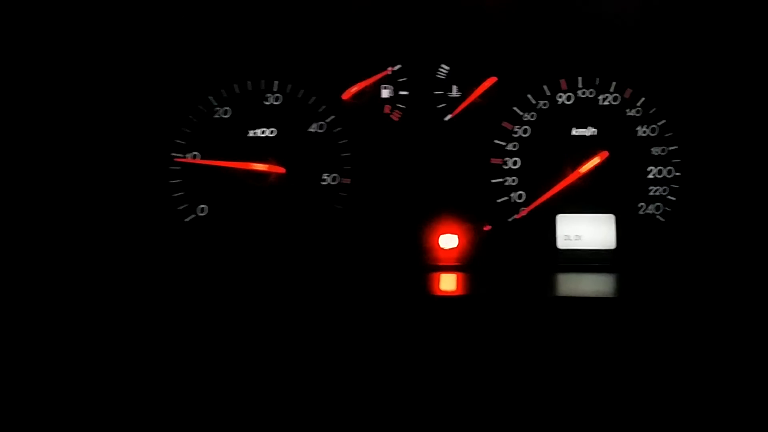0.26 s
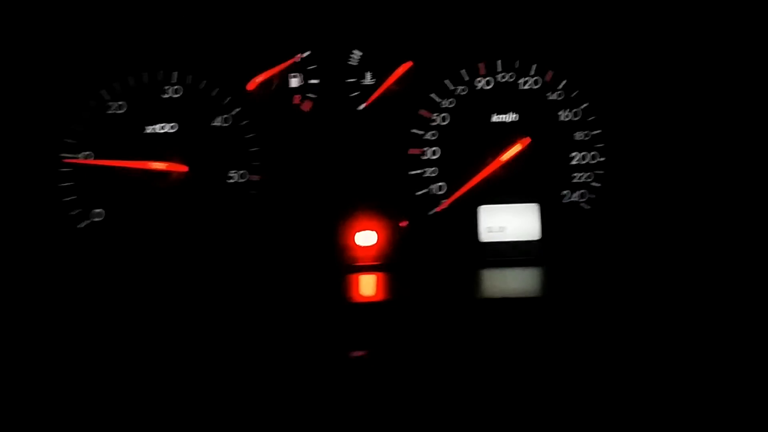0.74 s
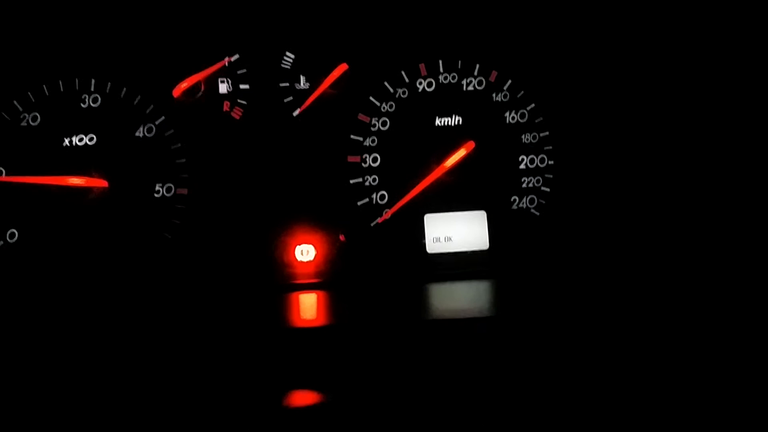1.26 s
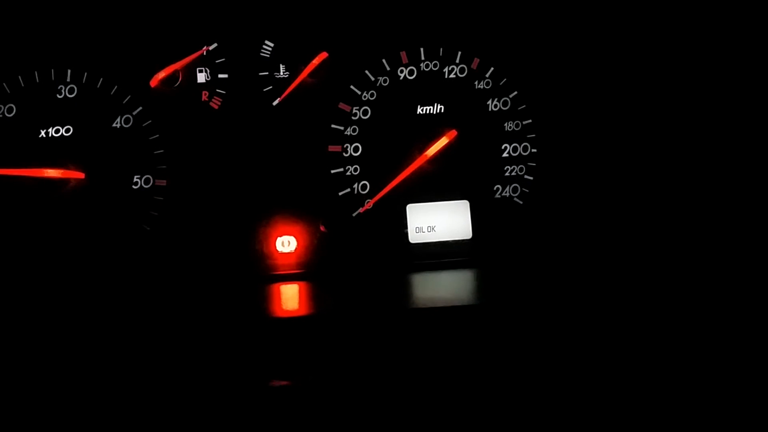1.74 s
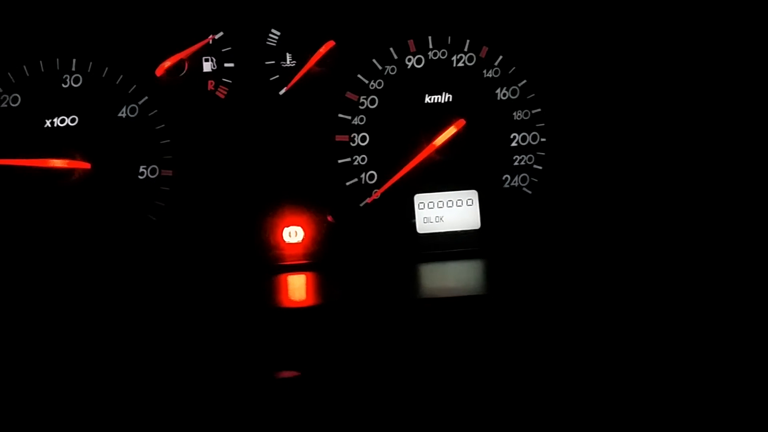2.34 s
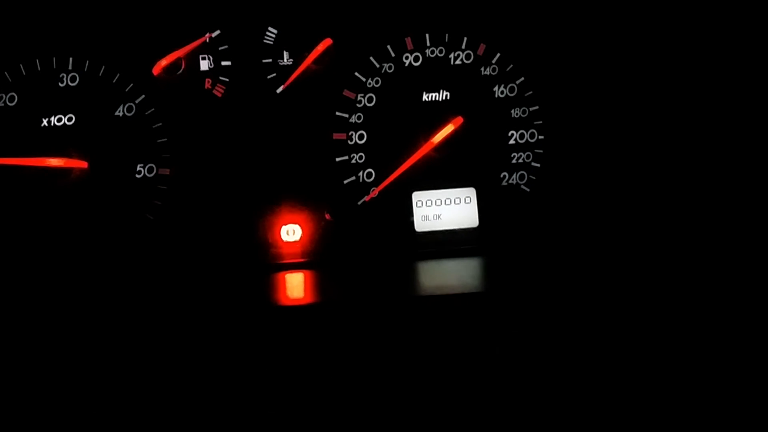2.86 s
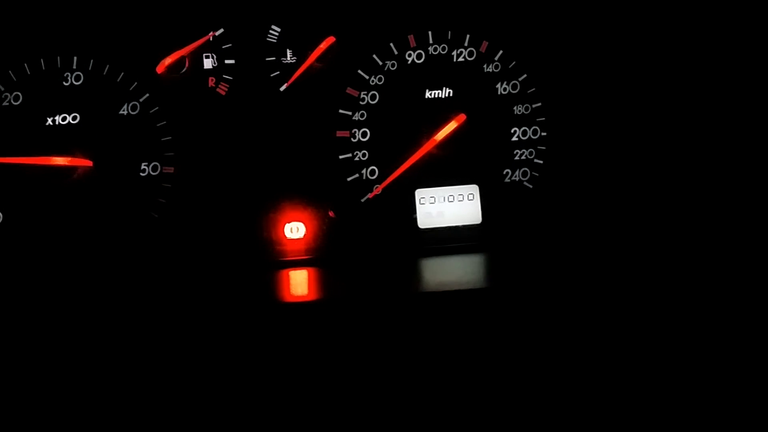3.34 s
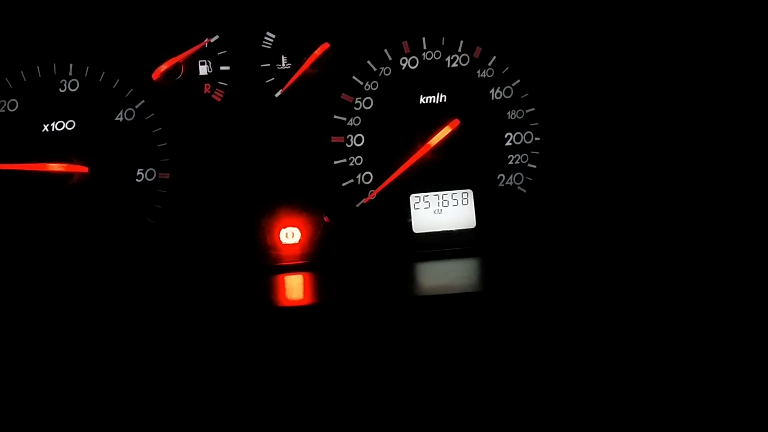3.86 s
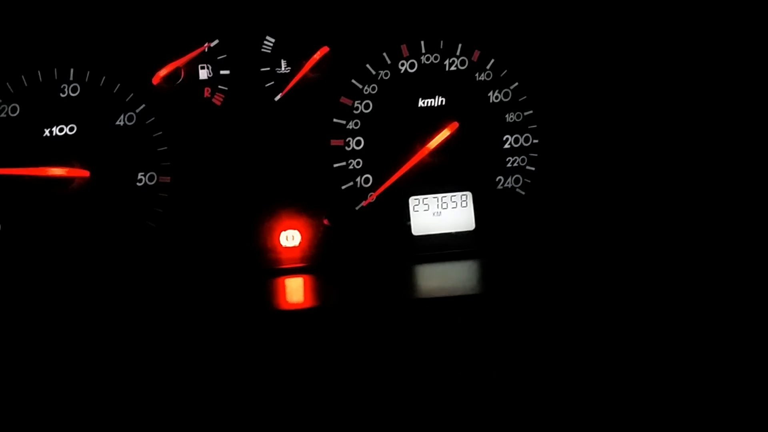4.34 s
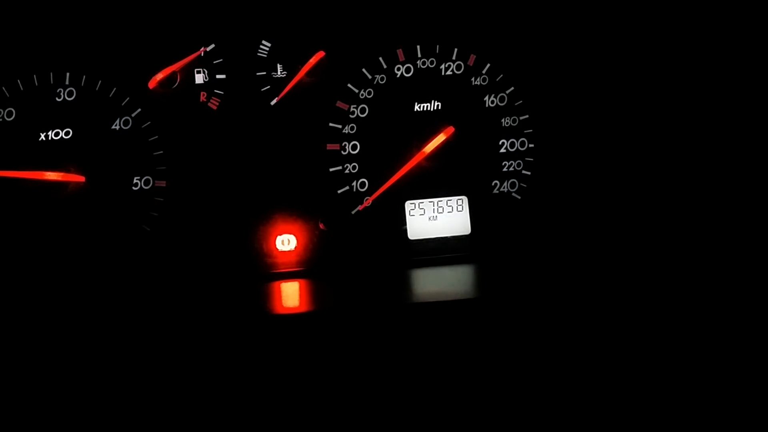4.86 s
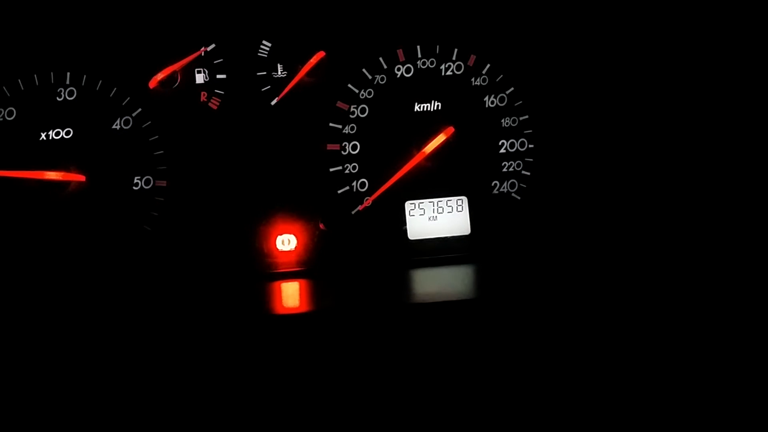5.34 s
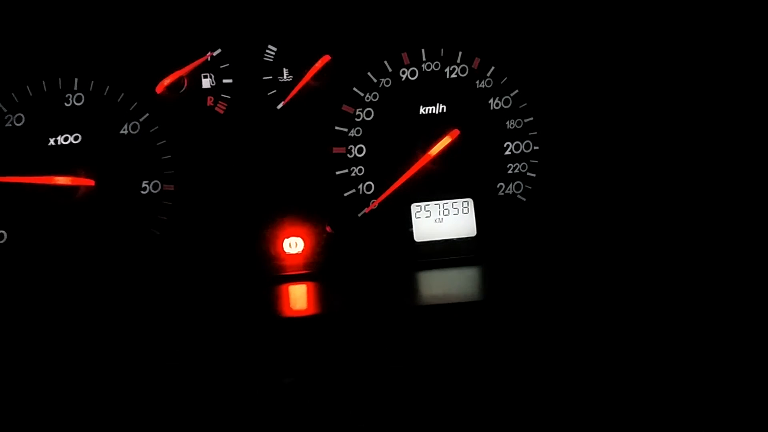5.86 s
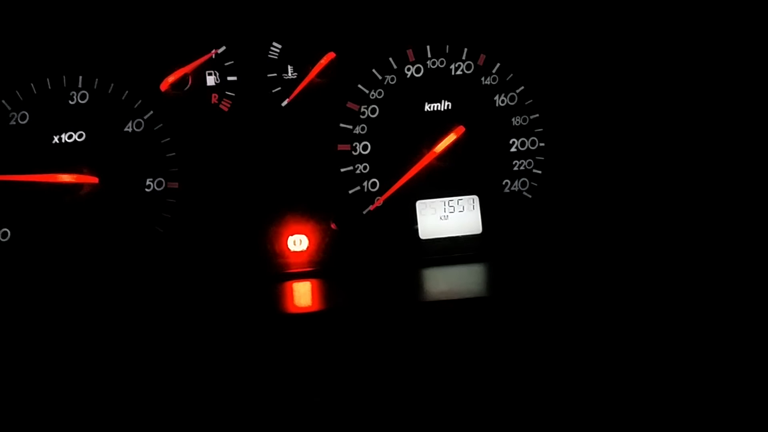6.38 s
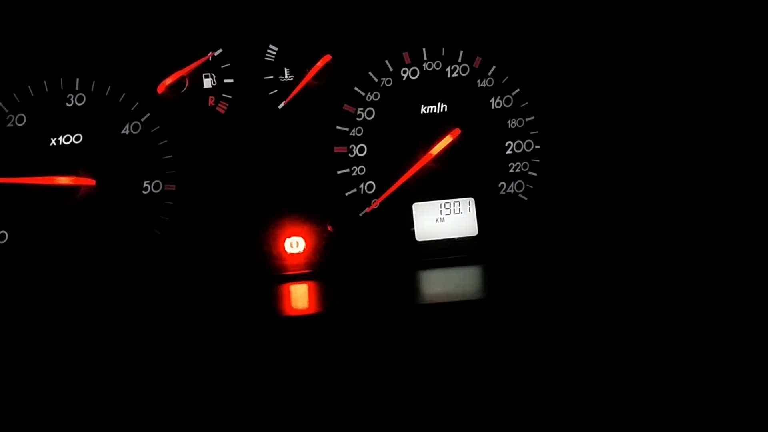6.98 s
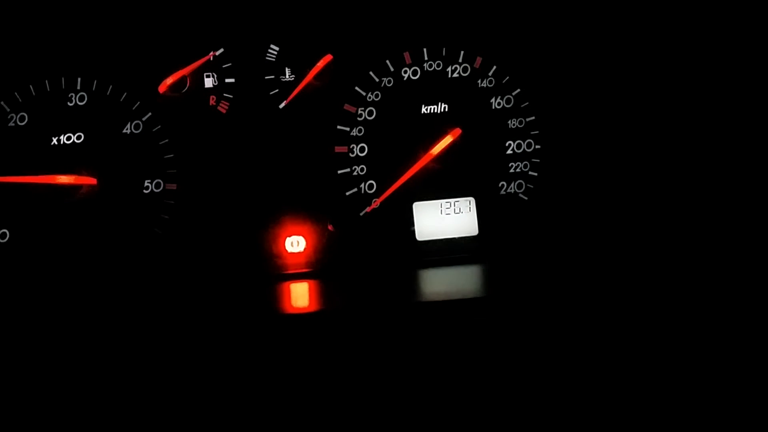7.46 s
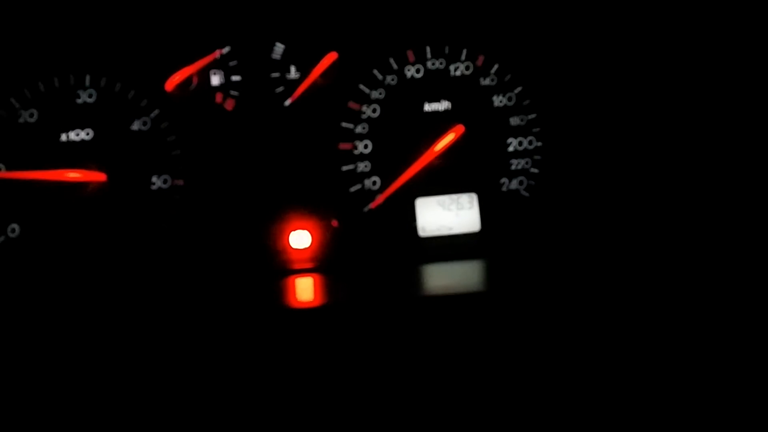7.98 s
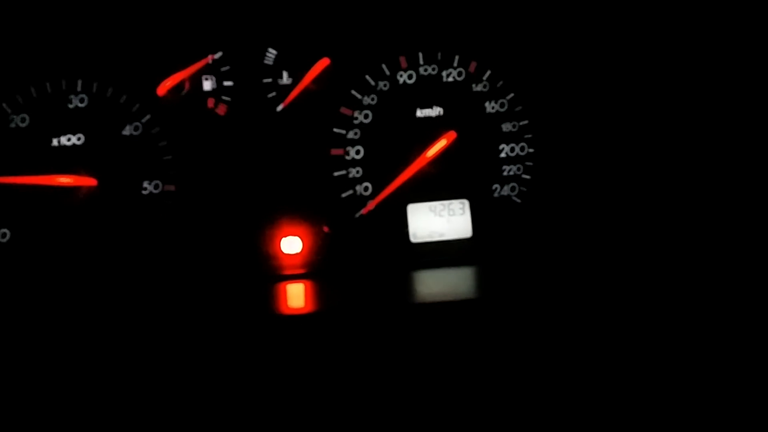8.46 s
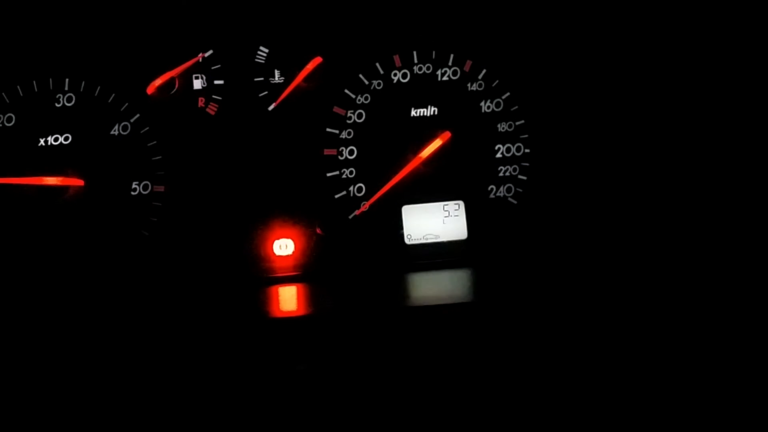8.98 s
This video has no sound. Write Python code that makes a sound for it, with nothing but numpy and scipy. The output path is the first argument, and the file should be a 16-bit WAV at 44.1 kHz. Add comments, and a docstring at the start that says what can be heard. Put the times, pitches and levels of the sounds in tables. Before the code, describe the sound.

A cold diesel engine idles steadily, heard from the driver's seat of a car. A low, booming hum fills the cabin, with muffled knocking, light clatter and a faint pulsing hiss. Plastic trim gives a few small clicks. About midway the engine speeds up slightly and loose trim buzzes briefly, then the idle settles again.

```python
"""The driver's seat of a car, where a cold four-cylinder turbodiesel idles at about 945 rpm.
Periodic firings force the cabin air to boom; impacts at fixed crank angles make the engine thump and
clatter behind the bulkhead, and injection hiss pulses over a low rumble and faint microphone hiss.
Plastic trim clicks now and then. Midway the engine speeds up briefly under load, and loose trim buzzes."""
import sys
import numpy as np
from scipy import signal
from scipy.fft import rfft, irfft
from scipy.io import wavfile

SR = 44100
rng = np.random.default_rng(int(sys.argv[2]) if len(sys.argv) > 2 else 0)


def put_to_file(sound):
    """Save the sound as 16-bit audio at rate SR, in the file named by the first command-line argument."""
    columns = np.atleast_2d(sound).T  # one column per channel
    safe = np.clip(columns, -1, 1)
    whole_steps = np.round(safe * 32767)
    wavfile.write(sys.argv[1], SR, whole_steps.astype(np.int16))


N = 406602
TIME = np.arange(N) / SR
FREQ = np.arange(N // 2 + 1) * SR / N + 1e-3

# The idle governor hunts, settles and lifts once under load: t/s, firing rate/Hz
FIRING_RATE = [(0.0, 32.36), (0.15, 31.17), (0.35, 32.46), (0.6, 30.91), (0.83, 31.81), (0.98, 30.95),
               (1.38, 31.93), (2.04, 31.15), (2.36, 32.24), (2.53, 31.45), (4.25, 31.3), (4.38, 33.4),
               (4.55, 33.7), (4.92, 33.3), (5.04, 32.45), (5.35, 32.06), (6.14, 31.38), (7.65, 31.33),
               (7.87, 31.8), (8.1, 31.28), (8.75, 31.05), (9.22, 31.75)]
# Boom harmonics: order (multiple of the firing rate), level/dB, gain above idle/dB, drift/(dB/s),
# gain under load/dB, waver/dB, share of the push
BOOM_ORDERS = [(1, -34.5, 0.6, 0.04, 3, 0.6, 0), (2, -38.5, 1.5, -0.52, -1.5, 0.9, 0.66),
               (3, -38.5, 4.5, -0.0048, -2, 1, 0.92), (4, -36.5, 0.5, -0.25, -14, 1.03, 0.92),
               (5, -42, -8, 0.16, -4, 0.5, 0.17), (6, -48.5, 1.5, 0.2, -9.5, 1, 0.16),
               (7, -52.5, 2, 0.51, -18, 2.5, 0), (8, -57, 2.5, -0.13, -4.5, 2.5, 0)]
# The firings push harder twice and ease off near the end: t/s, level/dB
FIRING_PUSH = [(0.15, -1), (0.42, 2), (0.65, -1), (1.4, 0), (4.2, -0.3), (5.9, -0.5), (7.6, -1.2),
               (7.92, 1), (8.25, -2.5), (8.85, -5.5), (9.2, -2)]
# Standing waves of the cabin air: f/Hz, half width/Hz
CABIN_MODES = [(78, 1.2), (155, 3.2), (186, 5.4), (221, 2.6)]
# Upper orders that sing as they cross a panel mode: order, mode f/Hz, width/Hz, peak level/dB
PANEL_DRONES = [(12, 375, 16, -59.5), (16, 500, 22, -59.5), (18, 575, 25, -59), (21, 660, 18, -62)]
# Orders that swell for a moment, mostly under load: order, start t/s, end t/s, level/dB
ORDER_SWELLS = [(7, 1.36, 3.1, -48), (1, 4.8, 5.25, -46), (3, 4.33, 5.2, -41), (3, 4.72, 5.7, -46.5),
                (4, 4.4, 4.74, -41), (5, 4.43, 4.73, -44), (5, 4.42, 5.0, -44), (6, 4.42, 4.62, -44),
                (6, 4.66, 5.0, -42.5), (11, 4.42, 5.0, -51), (12, 4.4, 5.0, -49), (8, 4.96, 5.22, -45.5),
                (4, 4.93, 5.45, -42)]
# Spectra of block and bulkhead, injection hiss and microphone hiss: f/Hz, level/dB
BLOCK_SPECTRUM = [(100, -10), (170, -9), (190, -15), (230, -3), (291, -11), (334, -3.5), (419, -14),
                  (498, -6), (541, -14), (582, -8.5), (830, -16.5), (901, -22), (1150, -25.5),
                  (1360, -29.5), (1500, -22.5), (1950, -92), (3300, -120)]
HISS_SPECTRUM = [(650, -10), (1100, 0.5), (1350, -8), (1430, -11.5), (1690, -3.5), (1850, -2.5), (2670, -8),
                 (3270, -8.5), (3740, -11.5), (4260, -11.5), (4650, -10.5), (5170, -13.5), (6280, -11),
                 (7160, -19.5), (9000, -26), (11700, -31), (19800, -120)]
MIC_HISS_SPECTRUM = [(3820, -32), (6500, -17), (7220, -4.5), (8480, -2), (11100, -6), (15000, -2.5)]
# Strength of three engine noises: level/dB, offset at the start/dB, drift/(dB/s), gain under load/dB
KNOCK_EFFORT = (-38, -1, -0.2962, 0.5)
HISS_EFFORT = (-51.5, 1, -0.1655, 2)
PIPE_EFFORT = (-67.5, 8.5, -0.05, -5)
# Blows in each cycle: place/firings, f/Hz, width/Hz, decay/s, level/dB, drift/(dB/s), roughness (0-1)
CLATTER_BLOWS = [(2.02, 570, 290, 0.0025, -55, -0.37, 0.6), (2.42, 497, 90, 0.0026, -55, -0.5, 0.5),
                 (.5, 435, 430, 0.0028, -58.5, 0, 0.55), (.45, 800, 130, .004, -62.5, -.3, .7),
                 (1.4, 812, 70, .004, -60, -.1, .7), (3.25, 960, 650, .006, -63, -.1, .9),
                 (3.2, 1900, 320, .004, -60, -.5, .96), (3.6, 2070, 300, .006, -62.5, -1.2, .96),
                 (.18, 1830, 220, .0032, -67.3, .6, .9), (1.23, 1830, 220, .0025, -76.5, .85, .85),
                 (2.29, 1830, 220, .0025, -76.5, .95, .85), (3.15, 3120, 500, .0018, -70.5, -.6, .85),
                 (3.5, 3060, 450, .002, -74, -.4, .9), (.09, 3300, 500, .0015, -82, .9, .8),
                 (.24, 3280, 380, .0025, -75.5, .8, .85), (.54, 3200, 500, .002, -79, .5, .85),
                 (1.2, 3300, 500, .002, -83, 1.05, .8), (1.47, 3200, 600, .001, -84, .7, .8),
                 (2.17, 3300, 500, .0015, -85, .8, .8)]
# Strength of the once-a-cycle thump: t/s, level/dB
THUMP_LEVEL = [(0.2, -39.5), (0.8, -42), (1.1, -45), (2.05, -46), (2.4, -43), (2.9, -45), (3.3, -47.5),
               (4.2, -46.5), (4.35, -42.5), (5.4, -45.5), (5.8, -44.5), (9.2, -44.3)]
# Snaps of the trim: t/s, level/dB, relative level of thin ring/dB, relative level of treble spit/dB
TRIM_CLICKS = [(0.6362, -34.5, 13, -6), (1.6172, -39, -9, -22), (1.8061, -30.5, 3, -20),
               (3.1567, -46.5, -10, -25), (6.3055, -36.8, -20, -30), (7.1513, -35.5, -8, -22),
               (8.6073, -50, -16, -30), (8.8020, -39, -13, -28)]
# The plastic rebounds within each click: delay/s, relative level/dB
CLICK_REBOUNDS = [(0, 0), (.0042, -3.5), (.0105, -9), (.016, -13)]
# Modes of the plastic trim: f/Hz, width/Hz, level/dB
TRIM_MODES = [(1040, 51, -6), (1540, 130, 11.5), (1930, 170, 6), (2560, 70, 8.5), (3150, 150, -2),
              (4460, 590, -6), (5500, 150, -1)]
# Level difference between the ears: f/Hz, left minus right/dB
EAR_BALANCE = [(60, 4), (150, 4.5), (300, 4), (600, 3), (1000, 3), (1900, 6.5), (3200, 6.5), (4600, 6.5),
               (6200, 15), (8500, 11.5), (12000, 3), (15000, 6.5)]

IDLE_HZ, OFF_IDLE_HZ = 31.41, 0.8  # settled firing rate; shift that takes an order on or off resonance
BUILD_UP_S = 0.053  # the boom follows a change of speed this much later
SWELL_ATTACK_S, SWELL_RELEASE_S = 0.1, 0.098
LOAD_START_S, LOAD_ATTACK_S, LOAD_HOLD_S, LOAD_RELEASE_S = 4.38, 0.135, 0.47, 0.64


def undb(db):
    """Amplitude ratio of a level in decibels."""
    return 10 ** (np.asarray(db) / 20)


def unit(x):
    """Normalisation to rms 1."""
    return x / np.sqrt(np.mean(x ** 2))


def curve(table):
    """Linear interpolation of a time table at every sample."""
    return np.interp(TIME, *np.transpose(table))


def spectrum_db(table):
    """Interpolation of a spectrum over log frequency, at every bin."""
    hz, db = np.transpose(table)
    return np.interp(np.log(FREQ), np.log(hz), db)


def colour(x, gain):
    """Filtering by multiplication of the spectrum."""
    return irfft(rfft(x) * gain, N)


def resonance(hz, width):
    """Response of a damped oscillator, gain 1 at its centre."""
    return 1 / (1 + 1j * hz / width * (FREQ / hz - hz / FREQ))


def waver(rate_hz):
    """Random fluctuation: low-passed noise of rms 1."""
    return unit(colour(rng.standard_normal(N), np.exp(-(FREQ / rate_hz) ** 2)))


def pulses(times, sizes):
    """Impulse train with the given times and sizes."""
    at = np.round(np.ravel(times) * SR).astype(int)
    inside = (at > 0) & (at < N - 1)
    return np.bincount(at[inside], np.ravel(sizes)[inside], N)


def bursts(hits, decay_s):
    """Each impulse starts noise that swells and decays, uncorrelated between the ears."""
    fall = np.exp(-1 / (decay_s * SR))
    envelope = signal.lfilter([np.e * (1 - fall)], np.poly([fall, fall]), hits)
    return envelope * rng.standard_normal((2, N))


def strikes(crank, places, sizes, scatter_db, jitter_s):
    """Quasi-periodic impacts, returning at the same places of each four-firing cycle."""
    angles = 4 * np.arange(-1, crank[-1] / 4)[:, None] + places
    times = np.interp(angles, crank, TIME, left=-1, right=-1)
    late, strong = rng.standard_normal((2,) + times.shape)
    return pulses(times + jitter_s * late, sizes * undb(scatter_db * strong))


def load():
    """Trapezoidal envelope of the extra engine load, 0 to 1."""
    corners = LOAD_START_S + np.cumsum([0, LOAD_ATTACK_S, LOAD_HOLD_S, LOAD_RELEASE_S])
    return np.interp(TIME, corners, [0, 1, 1, 0])


def effort(db, start_db, drift_db_per_s, load_db, settle_s=0.47):
    """Gain of an engine noise: it settles exponentially, eases as the oil warms and follows load."""
    return undb(db + start_db * np.exp(-TIME / settle_s) + drift_db_per_s * TIME + load_db * load())


def cabin_boom(crank, firing_hz, drone_waver_db=2.5):
    """Forced vibration: firings rock the body; a harmonic lags half a cycle per cabin mode below it."""
    def order(k):
        lag = sum(np.pi / 2 + np.arctan((k * firing_hz - hz) / width) for hz, width in CABIN_MODES)
        return np.sqrt(2) * np.exp(1j * (2 * np.pi * k * crank - lag))
    delayed_hz = np.interp(TIME - BUILD_UP_S, TIME, firing_hz)
    above_idle = np.tanh((delayed_hz - IDLE_HZ) / OFF_IDLE_HZ)
    push_db = curve(FIRING_PUSH)
    out = 0
    for k, db, fast_db, drift_db, load_db, waver_db, share in BOOM_ORDERS:
        sway_db = fast_db * above_idle + share * push_db + waver_db * waver(6.1)
        out += order(k) * effort(db, 0, drift_db, load_db) * undb(sway_db)
    for k, hz, width, db in PANEL_DRONES:
        detuning = 2 * (k * firing_hz - hz) / width
        out += order(k) * undb(db + drone_waver_db * waver(5.3)) / (1 + 1j * detuning)
    for k, start_s, end_s, db in ORDER_SWELLS:
        ramps = np.minimum((TIME - start_s) / SWELL_ATTACK_S, (end_s - TIME) / SWELL_RELEASE_S)
        out += order(k) * undb(db) * np.clip(ramps, 0, 1)
    # unequal cylinders modulate the boom once per turn of the crank
    return out.real * (1 + 0.047 * np.cos(np.pi * crank))


def block_knock(crank, count=96, coherent_hz=2400, opposed_hz=1550, roughness=0.44):
    """Structure-borne sound: valves, pump and pistons tap the block all round the cycle."""
    paths = []
    for _ in range(2):
        places = (np.arange(count) + rng.random(count)) * 4 / count
        taps = strikes(crank, places, rng.choice([-1, 1], count), scatter_db=1.5, jitter_s=0.00018)
        paths.append(unit(taps) + roughness * rng.standard_normal(N))
    # the lows reach both ears in phase, the mids partly in antiphase
    coherence = np.exp(-FREQ / coherent_hz) * np.cos(np.pi * FREQ / opposed_hz)
    right = colour(paths[0], coherence) + colour(paths[1], np.sqrt(1 - coherence ** 2))
    ears = colour(np.array([paths[0], right]), undb(spectrum_db(BLOCK_SPECTRUM)))
    return unit(ears) * effort(*KNOCK_EFFORT)


def injection_hiss(crank, hiss_depth_db=1.2, ring_depth_db=6.5):
    """Amplitude modulation: hiss swells at each firing, and the fuel pipes ring just after it."""
    def gate(place):
        return np.tanh(2 * np.cos(2 * np.pi * (crank - place)))
    grains = rng.standard_normal((2, N)) * undb(hiss_depth_db * gate(0.027) + 0.35 * waver(160))
    hiss = unit(colour(grains, undb(spectrum_db(HISS_SPECTRUM))))
    pipe_modes = resonance(6190, 320) ** 2 + resonance(4600, 260) ** 2
    pipe_drive = rng.standard_normal((2, N)) * undb(ring_depth_db * gate(0.14))
    ring = unit(colour(pipe_drive, pipe_modes))
    return hiss * effort(*HISS_EFFORT) + ring * effort(*PIPE_EFFORT)


def mic_hiss():
    """Stationary noise: faint, steady, high microphone hiss, uncorrelated between the channels."""
    return undb(-61) * unit(colour(rng.standard_normal((2, N)), undb(spectrum_db(MIC_HISS_SPECTRUM))))


def rumble():
    """Band-limited noise: a steady low rumble, in phase at both ears."""
    return undb(-45.5) * unit(colour(rng.standard_normal(N), resonance(119, 93) ** 2))


def clatter(crank):
    """Impact excitation: combustion and valve gear ring engine parts; the ticks slowly fade or grow."""
    out = 0
    for place, hz, width, decay_s, db, drift_db, roughness in CLATTER_BLOWS:
        hits = strikes(crank, place, 1, scatter_db=1.2, jitter_s=.0002)
        mode = resonance(hz, width) ** 2
        clean = unit(colour(hits, mode))
        noisy = unit(colour(bursts(hits, decay_s), mode))
        blow = np.sqrt(1 - roughness ** 2) * clean + roughness * noisy
        out += blow * undb(db + drift_db * TIME)
    return out


def injector_ticks(crank):
    """Impact and resonance: an injector snaps shut before each firing, and its pipe answers higher."""
    def ticks(place, hz, width):
        hits = strikes(crank, place + np.arange(4), 1, scatter_db=1.5, jitter_s=.0002)
        return unit(colour(bursts(hits, decay_s=.001), resonance(hz, width) ** 2))
    return undb(-76) * ticks(.82, hz=4700, width=570) + undb(-78) * ticks(.9, hz=6200, width=700)


def bulkhead_thump(crank, start_hz=328, end_hz=214, length_s=0.0308, scatter_db=1.3, spread=0.026):
    """Dispersion: once a cycle a blow crosses the bulkhead, whose higher bending waves arrive first."""
    starts = np.interp(np.arange(3.82, crank[-1], 4), crank, TIME)
    blows = np.zeros(N, complex)
    for start_s, (strong, high, long) in zip(starts, rng.standard_normal((len(starts), 3))):
        span_s = length_s * (1 + 2 * spread * long)
        at = np.arange(int(start_s * SR), min(int((start_s + span_s) * SR), N))
        age = (TIME[at] - start_s) / span_s
        cycles = np.cumsum(start_hz + (end_hz - start_hz) * age) * (1 + spread * high) / SR
        blows[at] += undb(scatter_db * strong) * np.sin(np.pi * age) * np.exp(2j * np.pi * cycles)
    ears = np.array([blows, blows * np.exp(-1j)]).real  # the right ear lags by one radian
    return unit(ears) * undb(curve(THUMP_LEVEL))


def trim_clicks(snap_s=.0011, tail_s=.008, tail_db=-20, ring_s=.002):
    """Free vibration: plastic panels snap, rebound and ring in their modes, with a spit of treble."""
    times, db, ring_db, spit_db = np.transpose(TRIM_CLICKS)
    hits = sum(pulses(times + delay_s, undb(db + drop_db)) for delay_s, drop_db in CLICK_REBOUNDS)
    snaps = bursts(hits, snap_s) + undb(tail_db) * bursts(hits, tail_s)
    modes = sum(undb(mode_db) * resonance(hz, width) for hz, width, mode_db in TRIM_MODES)
    crack = resonance(1900, 2400) ** 2
    panel = (modes / 2 + .7 * crack) / np.sqrt(1 + (FREQ / 5200) ** 8 + (1150 / FREQ) ** 8)
    body = colour(snaps, panel / np.sqrt(np.mean(np.abs(panel) ** 2)))
    ring_band = resonance(6150, 1100) ** 2 / np.sqrt(1 + (FREQ / 7200) ** 24)
    ring = colour(bursts(pulses(times, undb(db + ring_db)), ring_s), ring_band)
    spit = colour(bursts(pulses(times, undb(db + spit_db)), snap_s), resonance(9000, 12000))
    return body + ring + spit


def trim_buzz(crank, loaded_db=-20, unloaded_drop_db=30):
    """Forced rattling: loose trim taps once a firing, hardest while the load shakes the cabin."""
    taps = strikes(crank, .77 + np.arange(4), 1, scatter_db=1, jitter_s=.0001)
    modes = resonance(5300, 1200) ** 2 + undb(1.0) * resonance(2800, 1200) ** 2
    return colour(taps * undb(loaded_db - unloaded_drop_db * (1 - load())), modes)


def scene():
    """Superposition: the engine sounds share one crank, and the left of the cabin is the louder side."""
    firing_hz = curve(FIRING_RATE)
    crank = np.cumsum(firing_hz) / SR - .5  # counted in firings, four to a cycle
    impacts = block_knock(crank) + bulkhead_thump(crank) + clatter(crank)
    engine = cabin_boom(crank, firing_hz) + impacts + injection_hiss(crank) + injector_ticks(crank)
    mix = engine + mic_hiss() + rumble() + trim_clicks() + trim_buzz(crank)
    sides = undb(np.array([[1], [-1]]) * spectrum_db(EAR_BALANCE) / 2)
    return colour(mix, sides / sides.mean(axis=0))


def record(dry):
    """Band limiting: a steep elliptic low-pass cuts the treble above 15.4 kHz."""
    return signal.sosfilt(signal.ellip(14, .1, 70, 15400, fs=SR, output="sos"), dry)


dry = scene()
out = record(dry)
put_to_file(out)
```